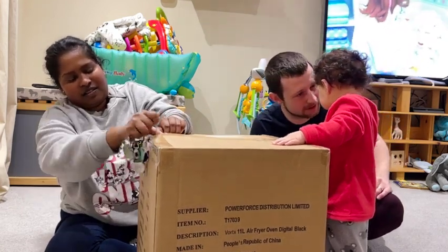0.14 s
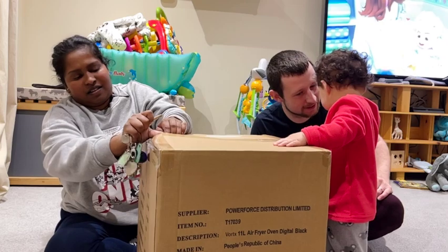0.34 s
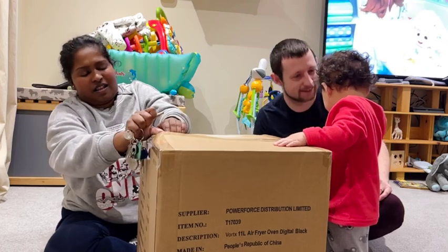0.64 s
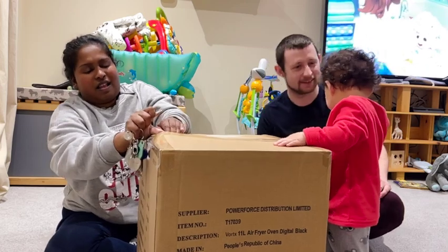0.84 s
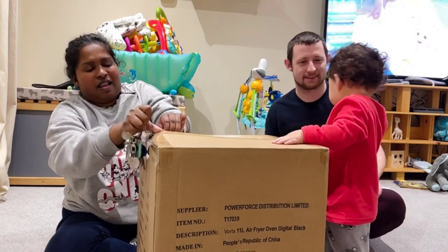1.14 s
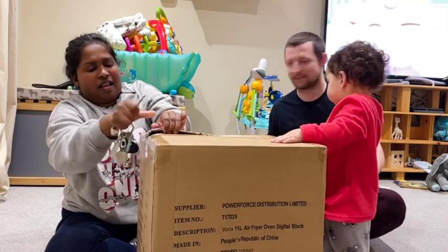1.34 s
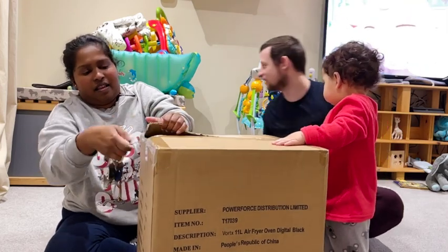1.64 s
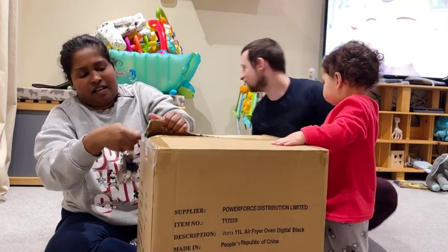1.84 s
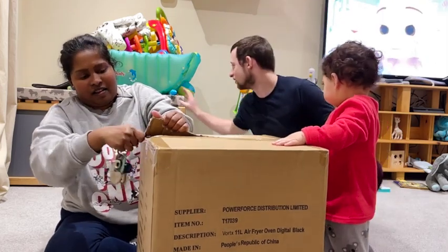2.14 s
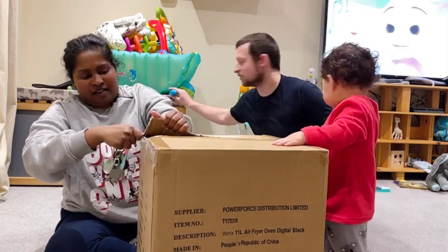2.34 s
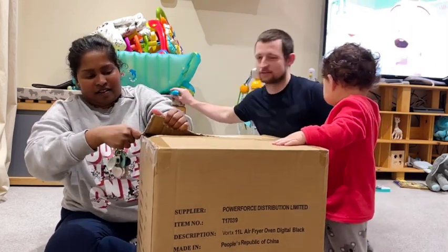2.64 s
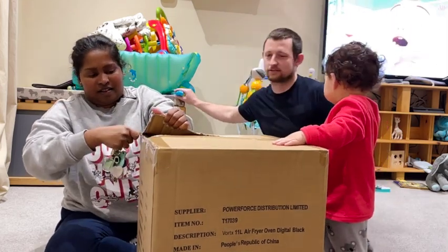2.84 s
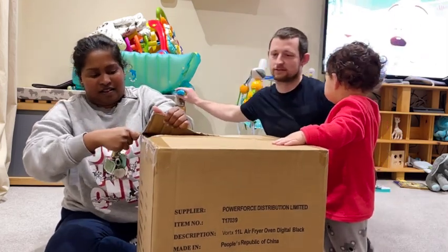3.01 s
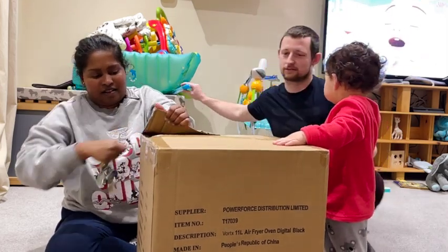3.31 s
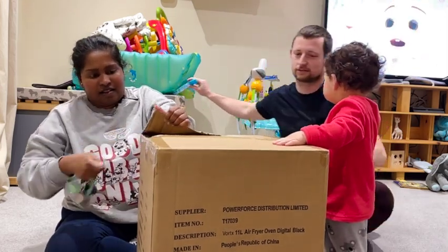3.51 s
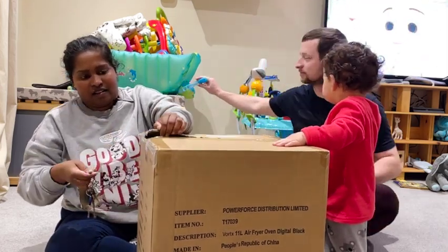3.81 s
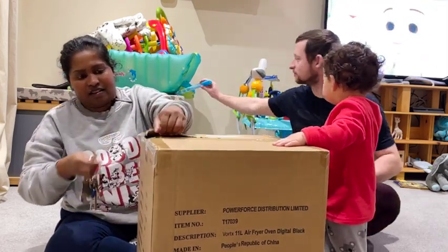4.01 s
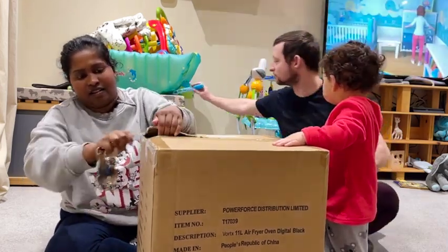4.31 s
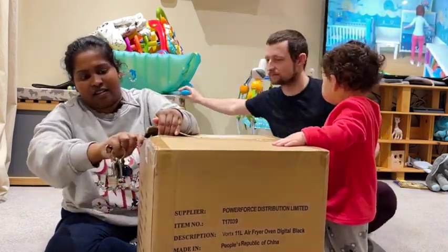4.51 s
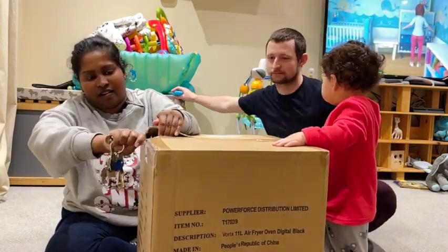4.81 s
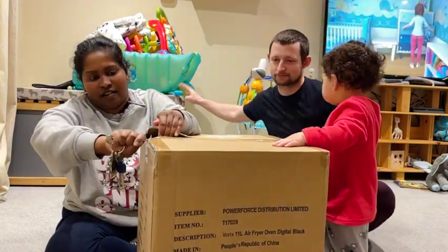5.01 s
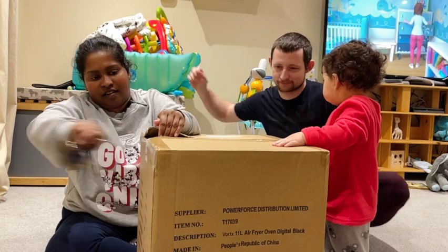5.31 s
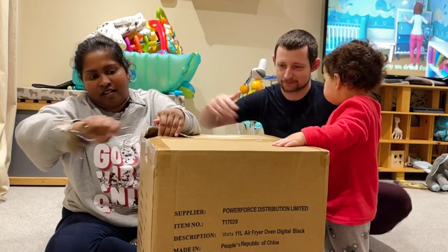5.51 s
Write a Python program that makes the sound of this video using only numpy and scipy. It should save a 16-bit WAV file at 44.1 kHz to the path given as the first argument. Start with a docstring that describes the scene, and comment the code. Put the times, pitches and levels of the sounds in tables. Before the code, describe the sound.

Close up in a small carpeted room, a key saws at packing tape on a large cardboard box. It opens with a rasp, a hollow thump and a clink, then light snaps, then harder ripping strokes and box knocks. Just after three seconds the keys jangle brightly; a quieter rustling stretch follows, and a last scrape ends in more jingling.

```python
"""In a small carpeted room, a key is dragged in short strokes through packing tape on a big cardboard box.
Stick-slip impulses make the tape rasp; short noise flicks make it snap; card squeaks are gliding sines.
The flap's tugs are damped swings that set the box panel ringing. The rest of the bunch clinks and jangles:
metal chatter plus decaying brass modes. Filtered noise gives sliding hands, rocking box and room air."""
import sys
import numpy as np
from scipy import signal
from scipy.fft import rfft, irfft, next_fast_len
from scipy.io import wavfile
from scipy.ndimage import map_coordinates

SR = 44100
rng = np.random.default_rng(int(sys.argv[2]) if len(sys.argv) > 2 else 0)


def wrap_up_sound(samples):
    """Save the sound to the file named by the first command line argument, as 16-bit audio."""
    columns = np.atleast_2d(samples).T
    # keep every value between -1 and 1, then stretch to whole-number steps
    tamed = np.clip(columns, -1, 1)
    steps = np.round(tamed * 32767).astype(np.int16)
    wavfile.write(sys.argv[1], SR, steps)


N = 249457

# Strokes of the key and tugs on the tape; boom and hiss are relative to the rasp
# [start_s, length_s, level_db, pitch_hz, panel_boom_db, tape_hiss_db]
STROKES = [(0, 0.0093, -25, 1870, 1.5, 5.5), (.028, 0.026, -21.5, 1030, -1, -6),
           (0.393, 0.03, -49, 1930, -5, 1.5), (0.707, 0.029, -40.5, 2270, -11, -1),
           (1.124, 0.025, -23, 1420, -13, -25), (1.157, .04, -22, 1280, -13.5, -15),
           (1.393, 0.043, -24, 1810, -6, -8), (1.816, .15, -28, 2650, -0.5, -19.5),
           (2.163, 0.052, -27, 1310, -3, -10), (2.231, 0.059, -25, 1240, -6.5, -18.5),
           (2.393, 0.05, -21, 1920, -2, -19), (2.606, 0.025, -27.5, 1400, -4, -19.5),
           (2.624, 0.033, -23, 1540, -1.5, -27), (2.736, 0.035, -22, 1190, -7.5, -19.5),
           (2.867, 0.026, -34, 1160, -3.5, -8), (3.056, 0.02, -29.5, 1190, -4.5, -11),
           (3.148, 0.037, -22, 1180, -5, -17), (3.995, 0.062, -29.5, 2330, -15, -6.5),
           (4.128, 0.036, -27, 2560, -18, -5.5), (4.169, 0.078, -36, 2210, -8, -4),
           (4.817, 0.023, -43.5, 1570, -1, -13), (4.91, 0.033, -45, 2050, -9, -8),
           (5.115, 0.1, -29, 1320, -7, -18), (5.193, .05, -24, 1470, -4, -18),
           (5.259, .025, -36.5, 1700, -7, -10)]
# Even scrape of card, before the flap's resonance [freq_hz, level_db]
RASP_SPECTRUM = [(150, -29), (450, -11), (800, 0), (1300, -3), (1800, -2), (2300, -3.5), (2900, -13),
                 (3700, -3.5), (4600, -27), (5800, -9.5), (9000, -38.5), (15000, -38)]
# Panel boom under a stroke [freq_hz, level_db]
BOOM_SPECTRUM = [(25, -13.5), (70, -25.5), (120, -2.5), (200, -0.5), (300, 0.5), (520, 4), (750, -8.5),
                 (1500, -64.5)]
# Tape peeling [freq_hz, level_db]
HISS_SPECTRUM = [(2000, -8), (3800, -9), (4600, 0.5), (6000, 11), (7000, 5), (9500, 2), (12000, -12.5),
                 (15500, -9.5)]
# The force builds over this share of a stroke, but never for longer than the limit
STROKE_SWELL_SHARE, LONGEST_SWELL_S = 0.39, 0.029
# Time to fall 20 dB: a base, plus a share of the stroke's length
STROKE_FADE_S, FADE_PER_LENGTH = 0.036, 0.44
# Slips a second at -25 dB; a harder pull tears in fewer slips (exponent)
SLIP_RATE, SLIP_EXPONENT = 2000, .9
# Height and half width of the flap's resonance
FLAP_DB, FLAP_OCTAVES = 9.5, 0.6


def cutting():
    """The key sticks and slips through the tape; the free flap colours the rasp and the panel booms."""
    out, t = np.zeros(N), np.arange(SR // 2) / SR
    for start_s, length_s, level_db, pitch_hz, boom_db, hiss_db in STROKES:
        swell_s = min(STROKE_SWELL_SHARE * length_s, LONGEST_SWELL_S)
        fade_s = STROKE_FADE_S + FADE_PER_LENGTH * length_s
        force = amp(level_db) * gesture(t, 0, length_s, swell_s, fade_s)

        rate = SLIP_RATE * amp(SLIP_EXPONENT * (-25 - level_db))
        slips = ticks(rate, spread_db=5.0, size=len(t))
        slips = slips + 0.41 * rng.standard_normal(len(t))  # fine scrape between the slips
        slips = slips * amp(2.5 * wobble(124.2, size=len(t)))

        flap_spectrum = []
        for hz in np.geomspace(100, 16000, 60):
            octaves_off = np.log2(hz / pitch_hz)
            resonance_db = FLAP_DB / (1 + (octaves_off / FLAP_OCTAVES) ** 2)
            flap_spectrum.append((hz, along(RASP_SPECTRUM, hz) + resonance_db))

        rasp = unit(colour(slips, flap_spectrum))
        boom = amp(boom_db) * unit(colour(slips, BOOM_SPECTRUM))
        hiss = amp(hiss_db) * unit(colour(slips, HISS_SPECTRUM))
        add(out, start_s, force * (rasp + boom + hiss))
    return out


# Tape and card fibres snap under the key [start_s, level_db, pitch_hz]
SNAPS = [(0.2266, -7, 2730), (0.2519, -11.5, 3500), (0.2677, -14.5, 2960), (0.5291, -30.5, 2380),
         (0.5648, -24.5, 3400), (.596, -27.5, 1890), (0.6972, -23, 5560), (0.9886, -15, 2660),
         (1.0447, -20.5, 2090), (1.1314, -10, 1500), (1.137, -17, 1880), (1.1715, -2, 1510),
         (1.3896, -3, 1370), (1.3993, -1.5, 2210), (1.417, -9, 2100), (1.4338, -14.5, 2800),
         (1.4762, -21, 1150), (1.575, -17.5, 2470), (1.6285, -19.5, 1880), (1.9916, -7, 2800),
         (2.135, -19, 1820), (2.176, -9, 1200), (2.3995, -6.5, 2220), (2.464, -14, 1940),
         (2.530, -24.5, 3610), (2.642, -6, 2000), (2.661, -8, 1300), (2.878, -16.5, 1170),
         (3.0639, -21, 1210), (2.9, -18.5, 1180), (3.166, -8.5, 2240), (3.191, -5, 2330), (4.2, -19, 1320),
         (4.3875, -21.5, 2620), (4.4492, -24.5, 2100), (4.714, -19.5, 2120), (5.1227, -8, 2760)]


def snaps():
    """A snap is a sharp, heavily damped flick of the card with a short crackle behind it."""
    out, t = np.zeros(N), np.arange(SR // 25) / SR
    for start_s, level_db, hz in SNAPS:
        crackle_fade = 0.24 * np.exp(-t / 0.0013) + 0.021 * np.exp(-t / 0.0044)
        push = rng.standard_normal(len(t)) * crackle_fade
        push[0] = 1  # the flick itself
        spectrum = [(hz / 8, -24), (hz / 2, -10), (hz, 0), (hz * 1.32, -7), (hz * 2.8, -20), (hz * 8, -34)]
        add(out, start_s, amp(level_db) * peaked(colour(push, spectrum)))
    return out


# The flap gives and knocks the box; the ring is relative to the swing
# [start_s, level_db, pitch_hz, panel_ring_db]
THUMPS = [(0.0307, -0.5, 560, -11.5), (.038, -9.5, 210, -6), (1.171, -10.5, 840, -19),
          (1.733, -23.5, 750, -13), (1.8873, -5.5, 420, -13), (1.9156, 1.5, 339, -10.5),
          (3.1623, -0.5, 920, -19.5), (3.1662, -3, 610, -22), (4.2, -24, 345, -5)]
# Box panel modes [freq_hz, level_db, t60_s]
PANEL_MODES = [(129.5, -15.5, 0.29), (183, -4, 0.12), (234, -9, 0.2), (291.5, -1, 0.12), (350, 1, 0.043),
               (507, -2, 0.039)]


def thumps():
    """One heavy, damped swing of the flap, with the hollow panel ringing on."""
    out, t = np.zeros(N), np.arange(SR // 4) / SR
    panel = bank(PANEL_MODES, t)
    for start_s, level_db, hz, ring_db in THUMPS:
        swing = np.sin(2 * np.pi * hz * t) * (hz * t) * np.exp(-hz * t / .5)
        panel_ring = ring(panel, scatter_db=7) * (1 - np.exp(-t / 0.0054))
        add(out, start_s, amp(level_db) * (peaked(swing) + amp(ring_db) * peaked(panel_ring)))
    return out


# Card squeaks as it rubs on card [start_s, length_s, level_db, start_pitch_hz, end_pitch_hz]
SQUEAKS = [(1.74, 0.026, -30.5, 693, 760), (1.821, 0.0675, -20, 887, 997)]


def squeaks():
    """Brief stick-slip tones whose pitch glides and trembles."""
    out = np.zeros(N)
    for start_s, length_s, level_db, start_hz, end_hz in SQUEAKS:
        u = np.linspace(0, 1, int(length_s * SR))
        glide_hz = start_hz + (end_hz - start_hz) * u
        pitch_hz = glide_hz * (1 + 0.088 * wobble(294, size=len(u)))
        swell = peaked(u ** .5 * (1 - u))
        add(out, start_s, amp(level_db) * swell * np.sin(2 * np.pi * np.cumsum(pitch_hz) / SR))
    return out


# Key strikes key; the ring is relative to the chatter
# [start_s, level_db, strongest_ring_hz, ring_db]
CLINKS = [(0.0114, -9.5, 6950, -2), (0.071, -8, 3900, -15.5), (.147, -13.5, 13200, -21),
          (1.277, -17.5, 6850, -10), (1.977, -9.5, 8840, -30), (2.117, -19, 14000, -36),
          (2.208, -14, 12100, -44), (3.007, -19, 12500, -24), (3.250, -5.5, 3040, 0),
          (3.278, -10.5, 11400, -5), (3.311, -6.5, 14200, -0.5), (3.3416, -3, 3160, -17),
          (3.3758, -5, 5700, -4), (3.3833, -2, 12700, 4), (3.4054, 4, 5850, -3.5), (3.41, -3, 8400, 23),
          (3.427, -4, 5540, -7), (3.4456, -10.5, 5500, -10), (3.4559, 2, 4000, -6.5),
          (3.507, -34, 5700, -9), (3.586, -19, 5730, -14.5), (3.663, -17, 3170, 0),
          (3.907, -21.5, 4350, -13), (4.231, -23, 12800, -19), (4.345, -29, 7660, -13),
          (4.558, -29, 3930, -12), (4.713, -14.5, 3100, -18), (5.2686, -9, 13300, -22),
          (5.321, -26, 3994, 10), (5.376, -15, 14200, 5), (5.392, -4.5, 4200, -6.5), (5.432, -2, 7060, -39),
          (5.438, -7, 7393, -9), (5.4769, -4.5, 4946, 5.5), (5.496, -5, 5800, 8), (5.6124, -5, 5560, -26),
          (5.635, -12, 5860, -21)]
# The keys' modes [freq_hz, level_db, t60_s]
BRASS_MODES = [(3025, -1, .11), (3112, -1, .12), (3480, -7, .05), (3989, 1, .18), (4950, -7, .07),
               (5028, -4, .12), (5200, -7, .07), (5475, -6, .07), (5636, -5, .09), (5739, -5, .09),
               (5787, -4, .11), (5938, -4, .08), (6740, -7, .08), (6864, -7, .1), (7600, -11, .05),
               (8403, -2, .14), (9141, -9, .07), (9997, -10, .07), (10384, -9, .09), (10944, -9, .07),
               (11526, -9, .08), (12694, -6, .08), (13050, -7, .07), (13894, -7, .08), (14163, -6, .1),
               (14756, -4, .11)]
# Metal contact noise [freq_hz, level_db]
CLASH_SPECTRUM = [(290, -32.5), (700, -21), (1600, -10), (2400, -8), (3070, -0.5), (3900, 0), (4500, -20),
                  (5200, -4), (5950, -2.5), (6800, -8), (7500, -9), (8400, -6.5), (10400, -11.5),
                  (12800, -17), (14300, -5), (15600, -20.5)]


def off_pitch_db(hz, pitch_hz):
    """Loss away from the struck key's pitch: down to -9 dB at half an octave and beyond."""
    return -9 * np.minimum(2 * abs(np.log2(hz / pitch_hz)), 1)


def clinks():
    """Hard strikes: a brief chatter of metal on metal and the modes near the struck key's pitch."""
    out, t = np.zeros(N), np.arange(SR // 4) / SR
    brass, short = bank(BRASS_MODES, t), t[:SR // 16]
    mode_hz = np.array(BRASS_MODES)[:, 0]
    for start_s, level_db, pitch_hz, ring_db in CLINKS:
        tone = ring(brass, scatter_db=7.5, favour_db=1.87 * off_pitch_db(mode_hz, pitch_hz))
        # a key pinched by its neighbours rings less and chatters more briefly
        life_s = 0.0036 * amp(0.27 * min(ring_db, 0))
        burst = np.exp(-short / life_s) * (1 - np.exp(-short / 0.0012))
        spectrum = [(hz, db + 1.15 * off_pitch_db(hz, pitch_hz)) for hz, db in CLASH_SPECTRUM]
        chatter = colour(rng.standard_normal(len(short)) * burst, spectrum)
        strike = amp(ring_db) * peaked(tone)
        add(strike, 0, peaked(chatter))
        add(out, start_s, amp(level_db) * peaked(strike))
    return out


# The hand shakes the bunch; levels before the tone and chatter trims [start_s, length_s, level_db]
SHAKES = [(0, 0.08, -27.5), (.1, 0.078, -35), (.265, 0.02, -38.5), (1.235, 0.054, -32.5),
          (1.87, .11, -42.5), (3.17, 0.033, -24.5), (3.235, 0.095, -33), (3.315, 0.055, -23.5),
          (3.378, 0.075, -20.5), (3.585, 0.088, -34.5), (4.548, .025, -33), (4.962, 0.016, -41),
          (5.2, 0.095, -34), (5.382, .14, -23.5), (5.598, .06, -20)]
SHAKE_RISE_S, SHAKE_SETTLE_S = 0.011, 0.074  # the keys start to swing; they settle by 20 dB


def jingle(count=900):
    """The hanging keys brush each other in many light contacts, each with its own mix of modes."""
    t = np.arange(SR // 10) / SR
    tone, chatter = np.zeros(N), np.zeros(N)
    swing = gestures(SHAKES, SHAKE_RISE_S, SHAKE_SETTLE_S)
    # touching keys detune and damp each other
    keys = []
    for load in (-1, 0, 0, 1):
        loaded_modes = np.array(BRASS_MODES) * [1 + .02 * load, 1, 1 - .4 * abs(load)]
        keys.append(bank(loaded_modes, t))
    scratch_fade = np.exp(-t / 0.0085)
    # one possible contact per equal time slot, placed at random within it
    for slot, (late, size) in enumerate(rng.uniform(-1, 1, (count, 2))):
        i = int((slot + .5 + .49 * late) * N / count)
        if swing[i] > 2e-5:  # no contact while the bunch hangs still
            blow = swing[i] * amp(3.8 * size)
            key = keys[rng.integers(len(keys))]
            add(tone, i / SR, blow * unit(ring(key, scatter_db=10)))
            add(chatter, i / SR, blow * rng.standard_normal(len(t)) * scratch_fade)
    return amp(-16) * tone + amp(6.5) * colour(chatter, CLASH_SPECTRUM)


# Sleeves and hands slide on the box; levels before the slide and crackle trims
# [start_s, length_s, level_db]
SLIDES = [(0, 0.26, -39), (.38, 0.2, -46), (.85, 0.5, -44.5), (1.15, 0.63, -40.5), (1.9, 0.45, -38),
          (2.62, .18, -41.5), (3.52, 0.34, -38.5), (3.88, 0.33, -44), (4.55, 0.27, -49), (5.13, 0.35, -37)]
# Rustle of cloth and skin on card [freq_hz, level_db]
RUSTLE_SPECTRUM = [(180, -20), (300, -5), (461, -6), (642, -7.5), (1820, -2.5), (2840, -10), (3830, -3.5),
                   (4660, -27), (5690, -13.5), (6820, -22.5), (9650, -17.5), (15600, -43.5)]
SLIDE_RISE_S, SLIDE_FADE_S = 0.04, .2  # a slide gets going; it dies by 20 dB


def handling():
    """Cloth and skin slide unevenly on the card, with tiny crackles from the stretched tape."""
    crackle = unit(colour(ticks(rate=88, spread_db=7.5), RUSTLE_SPECTRUM))
    pressure = amp(1.3 * wobble(28))
    slide = shifting(noise(RUSTLE_SPECTRUM), depth_db=4.5, cell_hz=712, cell_s=.07)
    movement = gestures(SLIDES, SLIDE_RISE_S, SLIDE_FADE_S)
    return movement * pressure * (amp(-3) * slide + amp(-7.5) * crackle)


# The whole box rocks under the hands [start_s, length_s, level_db]
ROCKS = [(1.18, 0.072, -41), (2.62, 0.25, -47), (3.15, 0.055, -49), (4.2, 0.17, -55.5), (4.7, 0.19, -53),
         (5.17, 0.058, -43)]
# Rumble of the rocking box [freq_hz, level_db]
RUMBLE_SPECTRUM = [(15, -10), (30, 2.5), (60, -7.5), (110, 3.5), (200, -17.5), (500, -60)]
ROCK_RISE_S, ROCK_FADE_S = .025, 0.11  # the box tips; it comes to rest by 20 dB


def rocking():
    """Pushed and released, the box rumbles on the carpet."""
    return gestures(ROCKS, ROCK_RISE_S, ROCK_FADE_S) * noise(RUMBLE_SPECTRUM)


# Decay of the small soft room [freq_hz, t60_s]
ROOM_DECAY = [(150, 0.4), (1000, 0.14), (4000, 0.43), (14000, 0.06)]


def room(x):
    """The walls' answer as decaying noise, 5 ms late, each band with its own decay time."""
    hz, t, z = signal.stft(rng.standard_normal(SR // 2), SR, nperseg=256)
    decay = amp(-60 * t / along(ROOM_DECAY, hz)[:, None])
    tail = signal.istft(z * decay, SR, nperseg=256)[1]
    echo = np.pad(tail / np.linalg.norm(tail), (SR // 200, 0))
    return signal.fftconvolve(x, echo)[:N]


# Room tone [freq_hz, level_db]
AIR_SPECTRUM = [(15, -20), (25, 2), (253, -3), (650, -4.5), (1380, 0.5), (2010, 0.5), (2640, -8),
                (3840, -1.5), (4640, -26), (5910, -6), (6590, -15.5), (9600, -18.5), (15600, -21.5)]
# A soft hollow rush sets in and stays
HUSH_START_S, HUSH_RISE_S, HUSH_DB, HUSH_UNEVENNESS_DB = 1.62, 0.26, -49, 0.25


def room_tone():
    """Steady air as filtered noise, joined by a soft, steady hollow rush."""
    hollow = noise([(100, -14.5), (300, -7.0), (480, 2.5), (800, -6), (2000, -61.5)])
    onset = np.clip((np.arange(N) / SR - HUSH_START_S) / HUSH_RISE_S, 0, 1)
    hush = onset * amp(HUSH_DB + HUSH_UNEVENNESS_DB * wobble(3.75)) * hollow
    return amp(-49.5) * noise(AIR_SPECTRUM) + hush


def amp(db):
    """Decibels to gain."""
    return np.exp(np.asarray(db) * (np.log(10) / 20))


def unit(x):
    """Scale to rms 1."""
    return x / np.sqrt(np.mean(x ** 2) + 1e-20)


def peaked(x):
    """Scale to peak 1."""
    return x / np.abs(x).max()


def along(points, hz):
    """Interpolate (Hz, value) points on a log frequency axis."""
    f, v = np.transpose(points)
    return np.interp(np.log(hz + 1), np.log(f), v)


def add(track, start_s, sound):
    """Mix a sound in at its start time."""
    start = max(round(start_s * SR), 0)
    track[start:start + len(sound)] += sound[:max(N - start, 0)]


def wobble(rate, size=N):
    """A smooth random curve, rate knots a second."""
    knots = rng.standard_normal(int(size * rate / SR) + 4)
    return map_coordinates(knots, [np.arange(size) * rate / SR])


def colour(x, spectrum):
    """Causal minimum-phase filter with the given (Hz, dB) shape."""
    m = next_fast_len(len(x) // 2 + 2048) * 2
    cepstrum = irfft(np.log(amp(along(spectrum, np.fft.rfftfreq(m, 1 / SR)))))
    # fold the cepstrum forward in time so that nothing sounds early
    cepstrum[1:m // 2] *= 2
    cepstrum[m // 2 + 1:] = 0
    return irfft(rfft(x, m) * np.exp(rfft(cepstrum)))[:len(x)]


def noise(spectrum):
    """Coloured noise of rms 1."""
    return unit(colour(rng.standard_normal(N), spectrum))


def ticks(rate, spread_db, size=N):
    """Random impulses of uneven size, about rate a second, rms 1."""
    sizes = amp(spread_db * np.clip(rng.standard_normal(size), -2, 2)) * rng.choice([-1, 1], size)
    return unit(sizes * (rng.random(size) < rate / SR))


def bank(modes, t):
    """One decaying sine for each mode."""
    hz, db, t60 = np.transpose(modes)[:, :, None]
    return amp(db - 60 * t / t60) * np.sin(2 * np.pi * hz * t)


def ring(sines, scatter_db, favour_db=0):
    """The modes, struck at a new spot each time: random levels and signs."""
    count = len(sines)
    levels = amp(favour_db + scatter_db * rng.standard_normal(count))
    return (levels * rng.choice([-1, 1], count)) @ sines


def shifting(x, depth_db, cell_hz, cell_s):
    """As the contact point wanders, it favours ever different resonances."""
    hz, t, z = signal.stft(x, SR, nperseg=512)
    knots = rng.standard_normal((int(hz[-1] / cell_hz) + 3, int(t[-1] / cell_s) + 3))
    field = map_coordinates(knots, np.meshgrid(hz / cell_hz, t / cell_s, indexing="ij"), order=1)
    gain = amp(depth_db * unit(field))
    return signal.istft(z * unit(gain), SR, nperseg=512)[1][:N]


def gesture(t, start, length, rise, fade):
    """A movement builds up, holds to the end of its length, then dies by 20 dB every fade seconds."""
    attack = np.sin(np.pi / 2 * np.clip((t - start) / rise, 0, 1)) ** 2
    return attack * amp(-20 * np.maximum(t - start - length, 0) / fade)


def gestures(rows, rise, fade):
    """Gain per sample of a series of like movements; the strongest one leads."""
    t = np.arange(N) / SR
    gains = [amp(db) * gesture(t, start, length, rise, fade) for start, length, db in rows]
    return np.max(gains, axis=0)


def scene():
    """Box and keys close by, in a small soft room."""
    tape = shifting(cutting(), depth_db=2.5, cell_hz=252.2, cell_s=.025)
    box = tape + snaps() + thumps() + squeaks()
    keys = shifting(clinks() + jingle(), depth_db=3.3, cell_hz=420, cell_s=.035)
    echoes = room(amp(-16) * box + amp(-19.5) * keys)
    return (box + keys + echoes + handling() + rocking() + room_tone())[None]


TOP_HZ = 15750  # band limit


def record(dry):
    """Clip any peaks beyond full scale, then remove everything above the band limit."""
    m = next_fast_len(N + SR // 2)
    kept = np.fft.rfftfreq(m, 1 / SR) < TOP_HZ
    return irfft(rfft(np.clip(dry, -1, 1), m) * kept, m)[:, :N]


dry = scene()
out = record(dry)
wrap_up_sound(out)
```